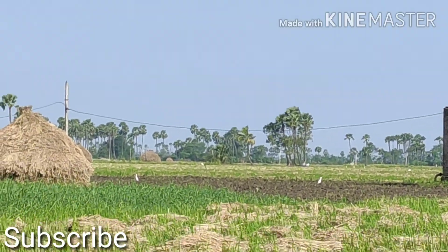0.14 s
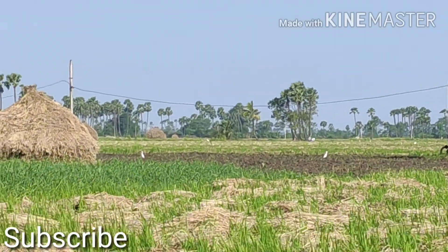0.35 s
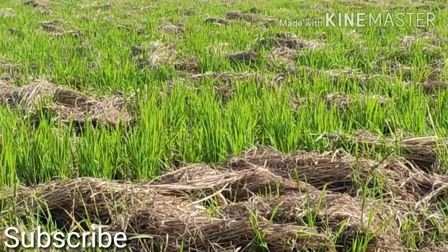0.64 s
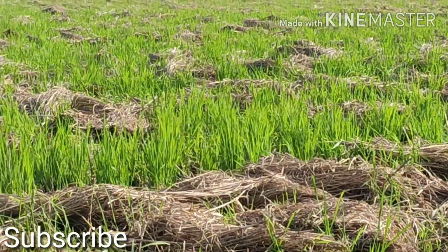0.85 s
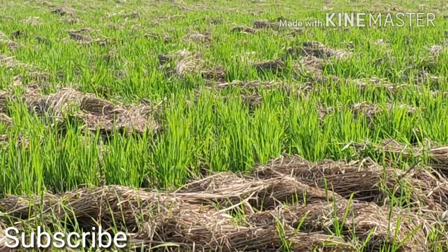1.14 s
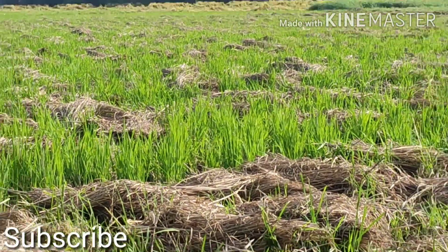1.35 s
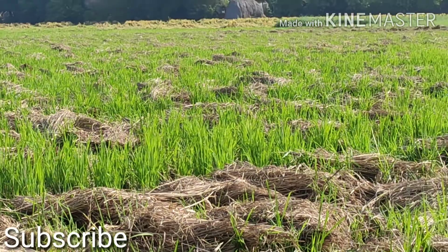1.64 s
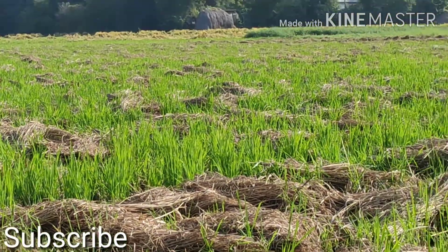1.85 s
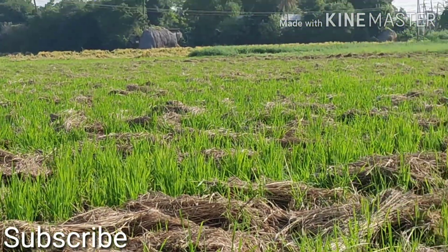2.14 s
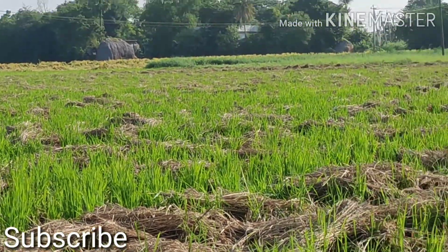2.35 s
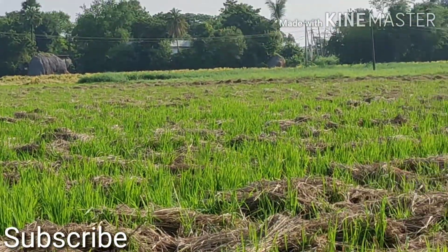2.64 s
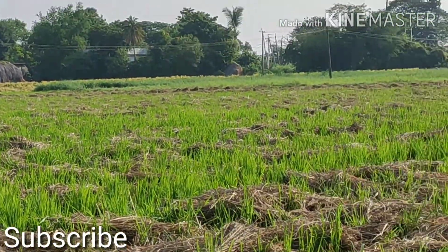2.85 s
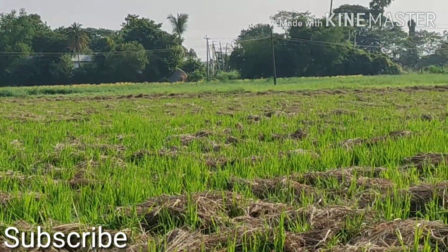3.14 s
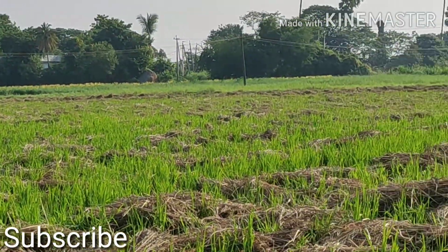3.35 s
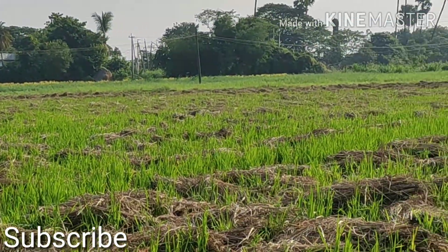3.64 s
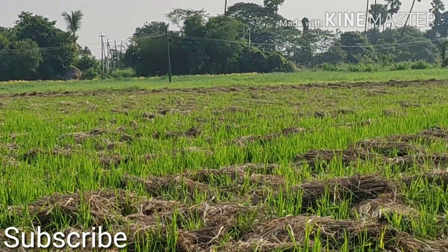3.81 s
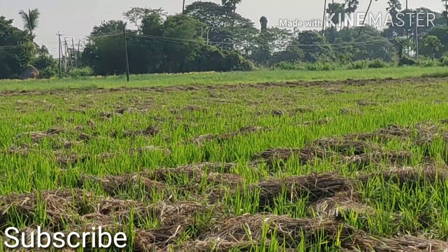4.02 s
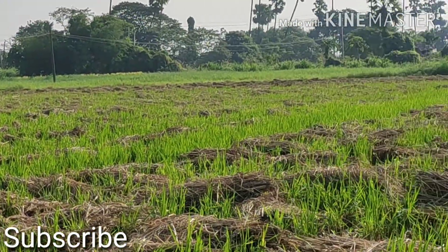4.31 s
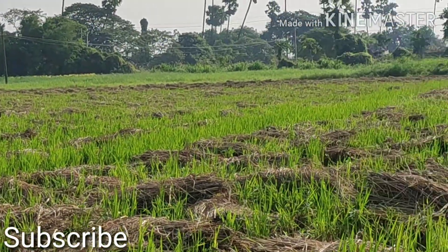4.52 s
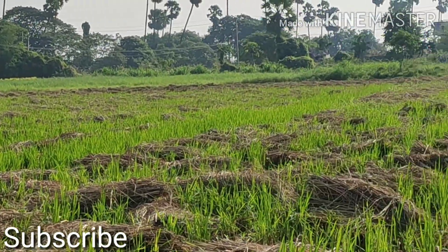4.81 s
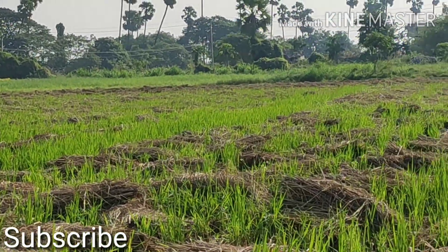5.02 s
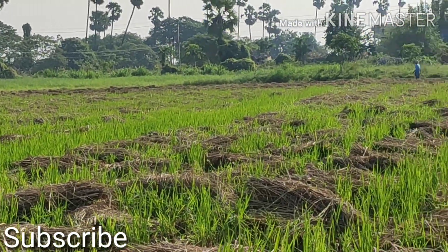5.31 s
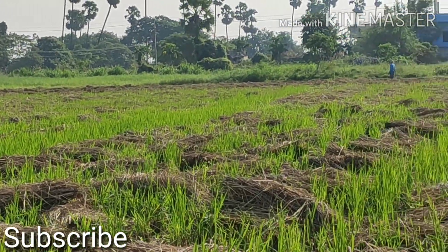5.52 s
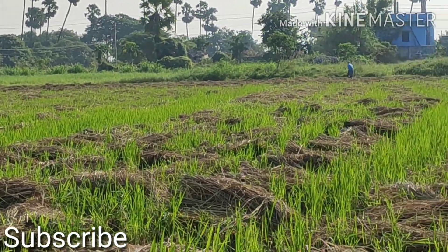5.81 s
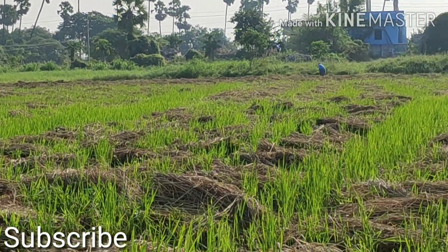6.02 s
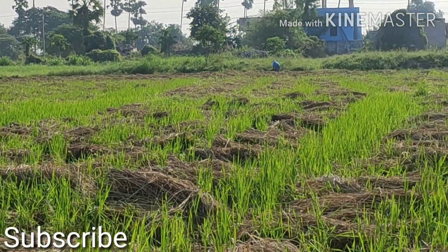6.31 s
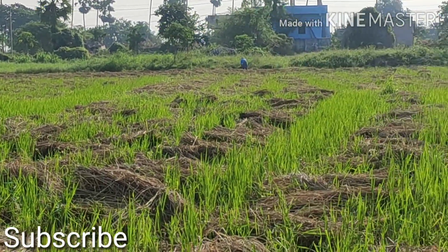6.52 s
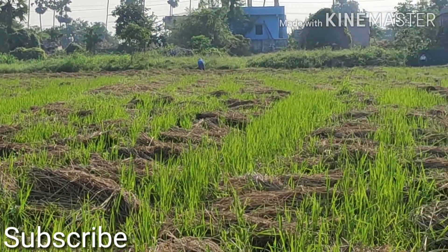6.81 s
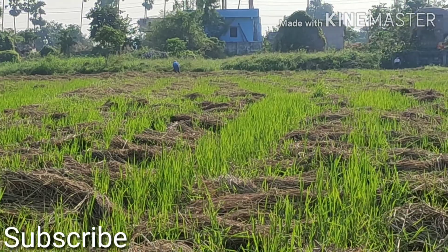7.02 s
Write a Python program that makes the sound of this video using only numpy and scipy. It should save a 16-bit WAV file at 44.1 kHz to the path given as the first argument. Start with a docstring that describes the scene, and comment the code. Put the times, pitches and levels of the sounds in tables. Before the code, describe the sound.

A quiet rural field heard through a small wind-bumped stereo microphone: soft low rumble, hiss and shimmering insects, stronger on the left. Distant crows and clucking fowl call ahead, a small bird slides down in chirps on the left. Midway one rooster crow dominates, rough at first, then thin and falling, with dry straw ticks nearby and a faint low hum fading in. Crows get clearer near the end.

```python
"""Wind bumps the microphone and the sound cuts out once, over buzzing insects, soft wind and a high hiss.
Arching, buzz-shaken caws and pulsed hoarse ones follow far off, with fowl, thin wavering whistles
and a small bird's sliding chirps on the left; resonant noise bursts tick and knock now and then.
As a low hum fades in, a rooster crows: two fluttering membranes rasp, then hold a long thin note that sags.
Trees scatter the calls back as decaying noise; caws, chirps, whistles, wind and insects carry on after it."""
import sys
import numpy as np
from scipy import signal
from scipy.fft import rfft, irfft, next_fast_len
from scipy.io import wavfile
from scipy.ndimage import uniform_filter1d, map_coordinates

SR = 44100
rng = np.random.default_rng(int(sys.argv[2]) if len(sys.argv) > 2 else 0)


def int16_out(signal):
    """Quantize to a 16-bit WAV file."""
    q = np.round(np.clip(np.atleast_2d(signal).T, -1, 1) * 32767)
    wavfile.write(sys.argv[1], SR, q.astype(np.int16))


N = 315756
TIME = np.arange(N) / SR

# resonances of the rooster's throat: f/Hz, level/dB
ROOSTER_THROAT = [(950, -11), (1100, -6.5), (1220, -5.5), (1350, -1.5), (1560, -0.5), (1720, -7.5),
                  (1950, -9), (2180, -15.5), (2330, -17), (2550, -19), (2850, -35), (3200, -24)]
LEFT_LEAD_S = .00006  # the small bird and the whistles reach the left port this much earlier


def amp(db):
    """Decibels to gain."""
    return 10 ** (np.asarray(db) / 20)


def unit(x):
    """Scale to rms 1."""
    return x / np.sqrt(np.mean(x ** 2) + 1e-20)


def along(points, hz):
    """Read (f/Hz, value) points on a log frequency axis."""
    f, v = np.transpose(points)
    return np.interp(np.log(hz + 1), np.log(f + 1), v)


def curves(rows, at=TIME):
    """One curve for each column after the first, which is the time or position."""
    s, *cols = np.transpose(rows)
    return [np.interp(at, s, c) for c in cols]


def wobble(rate, size=N):
    """A smooth random curve, rate knots a second."""
    knots = rng.standard_normal(int(size * rate / SR) + 4)
    return map_coordinates(knots, [np.arange(size) * rate / SR], order=2)


def filtered(x, response):
    """x shaped by a response of frequency in Hz."""
    size = x.shape[-1]
    m = next_fast_len(size + 8192)
    return irfft(rfft(x, m) * response(np.fft.rfftfreq(m, 1 / SR)), m)[..., :size]


def coloured(x, spectrum):
    """x through a spectrum with steep ends just beyond its outer points, at rms 1."""
    low_hz, high_hz = spectrum[0][0] / 1.2, spectrum[-1][0] * 1.2

    def response(hz):
        top = 1 / (1 + (hz / high_hz) ** 8)
        bottom = 1 / (1 + (low_hz / (hz + 1)) ** 8)
        return amp(along(spectrum, hz)) * top * bottom

    return unit(filtered(x, response))


def ring(x, centre_hz, width_hz):
    """x through one resonance applied twice."""
    def response(f):
        damping = 1j * f * width_hz
        return (damping / (centre_hz ** 2 - f * f + damping)) ** 2

    return filtered(x, response)


def turns(hz):
    """Phase in radians of a moving frequency."""
    return 2 * np.pi * np.cumsum(hz) / SR


def span(length):
    """0 to 1 over length seconds."""
    return np.linspace(0, 1, max(round(length * SR), 8))


def arch(u):
    """Strength of a call that swells and fades."""
    return np.sqrt(np.abs(np.sin(np.pi * u)))


def swell(s, width):
    """A bell of height 1 around s seconds."""
    return np.exp(-((TIME - s) / width) ** 2)


def note(length, hz, glide, bow, waver, waver_rate, harmonics_db):
    """A note that swells and fades while its pitch glides along a bow."""
    u = span(length)
    pitch = hz * (1 + glide * (u - .5) - bow * (2 * u - 1) ** 2)
    phase = turns(pitch * (1 + waver * wobble(waver_rate, size=len(u))))
    harmonics = sum(amp(db) * np.sin(k * phase) for k, db in enumerate(harmonics_db, 1))
    return np.sqrt(2) * arch(u) * harmonics


def evened(x):
    """x with its slow swings of level taken out, near rms 1."""
    window_s = 0.028  # only unevenness shorter than this survives
    return x / np.sqrt(np.abs(uniform_filter1d(x ** 2, size=round(window_s * SR))) + 1e-9)


def add(track, s, x):
    """Mix x into track at s seconds."""
    part = track[max(round(s * SR), 0):][:len(x)]
    part += x[:len(part)]


def placed(x, left_db):
    """A sound leaning left by left_db."""
    return x * amp(np.vstack([left_db / 2, -left_db / 2]))


def outdoors(x, left_db, wet_db, lead_s=0):
    """Direct sound, earlier on the left by lead_s, plus the scattered answer of the trees as decaying noise."""
    # how long the trees ring: f/Hz, time to fall 60 dB/s
    tree_decay = [(200, 0.35), (1500, 0.97), (4000, 0.34), (10000, 0.0088)]
    hz, t, z = signal.stft(rng.standard_normal((2, SR)), SR, nperseg=256)
    decay = amp(-60 * t / along(tree_decay, hz)[:, None])
    tail = signal.istft(z * decay, SR, nperseg=256)[1]
    tail = tail / np.linalg.norm(tail[0])
    direct = filtered(placed(x, left_db), lambda f: np.exp(1j * np.pi * lead_s * np.array([f, -f])))
    return direct + amp(wet_db) * signal.fftconvolve(direct, tail, axes=1)[:, :N]


def rush(spectrum):
    """Stereo noise of rms 1, alike in the bass and unrelated in the treble."""
    # likeness of left and right: f/Hz, correlation 0-1
    likeness = [(25, 0.33), (60, 0.93), (130, 1), (300, 0.86), (800, 0.33), (1500, 0), (3000, 0), (8000, 0)]

    def mid_side(hz):
        angle = np.arccos(np.clip(along(likeness, hz), -1, 1)) / 2
        return np.array([np.cos(angle), np.sin(angle)])

    mid, side = filtered(rng.standard_normal((2, N)), mid_side)
    return coloured(np.array([mid + side, mid - side]), spectrum)


def rooster():
    """Two membranes of the syrinx; when pressed hard they flutter and the clean note breaks into a rasp."""
    # low rasp of the chest: f/Hz, level/dB
    chest_rasp = [(300, -18), (500, -11), (620, 4), (680, 2), (800, -9), (900, -7), (1100, -10)]
    # friction in the throat: f/Hz, level/dB
    friction_colour = [(2800, -12), (3200, -9), (3700, -2), (4400, -7), (5100, -11), (5800, 1), (6200, 2),
                       (6700, -5), (7200, 1), (8500, -10)]
    # how the tired rasp dulls: f/Hz, gain/dB
    dulling_tilt = [(1650, 3.5), (1950, -4)]
    # stretch over which the rasp dulls and half tones creep in: start/s, end/s
    tired_span = (3.35, 3.634)
    pitch, over_gain, base_gain = syllables()
    rough, break_gain, friction_gain = breaks()
    # unsteadiness as shares of the pitch: slow drift, then fast jitter that grows with the rasp
    pitch = pitch * (1 + .0035 * wobble(35) + (.0055 + .028 * rough ** 2) * wobble(190))
    phase = turns(pitch)
    source = slaps(pitch, phase)
    tired = np.interp(TIME, tired_span, [0, 1])

    rasp = coloured(source, ROOSTER_THROAT)
    dulled = filtered(rasp, lambda hz: amp(along(dulling_tilt, hz)))
    rasp = (1 - tired) * rasp + tired * dulled
    # the rasp runs a quarter cycle off the clean note, so their powers add
    overtones = np.sqrt(1 - rough) * clean_note(pitch, phase) + np.sqrt(rough) * evened(rasp)
    # the tiring voice gains tones halfway between its harmonics
    halves = phase / 2 + .5 * wobble(90)
    overtones = overtones + amp(-22.5) * tired * (np.sin(halves) + np.sin(halves + phase))

    low_rasp = evened(coloured(source, chest_rasp))
    base = np.sqrt(2 * (1 - rough)) * np.sin(phase) + np.sqrt(rough) * low_rasp
    breath = rng.standard_normal(N) * (1 + np.cos(phase))
    friction = amp(-58) * friction_gain * coloured(breath, friction_colour)
    shimmer = amp(1.3 * wobble(45))  # the overtones waver in strength
    voice = shimmer * break_gain * over_gain * overtones + base_gain * base + growls()
    heard = outdoors(voice, left_db=-.8, wet_db=-14.5, lead_s=.00006)
    # the left port hears more of the treble
    heard = filtered(heard, lambda hz: placed(0.89, along([(1600, 0), (5000, 19)], hz)))
    return heard + outdoors(friction, left_db=10.5, wet_db=-5)


def syllables():
    """Pressure builds, holds and drops in each syllable, lifting pitch/Hz, overtone gain and fundamental gain."""
    # the crow's syllables: start/s, end/s, rise/s, fall/s, held pitch f/Hz, overtones level/dB,
    # change of the overtones at the edges/dB, fundamental level/dB
    crow_syllables = [(2.568, 2.775, 0.061, .075, 730.6, -39.5, -9.5, -51.5),
                      (2.881, 3.076, 0.037, 0.01215, 790, -34, -8.5, -45),
                      (3.056, 4.42, .055, .085, 784.7, -38.5, -3, -45)]
    # the long last syllable peaks, then sags as the bird tires:
    # t/s, pitch change/Hz, overtones change/dB, fundamental change/dB
    tiring_curve = [(3.12, 0, -1, 2.5), (3.18, 57, 3, 0.5), (3.22, 20, .5, -1), (3.3, -14.5, 1, 0),
                    (3.345, -25, -4.5, -10), (3.38, -17.5, -1.5, -16), (3.43, -14, 1.5, -7),
                    (3.48, -13.5, -1.5, -10), (3.565, -7.5, -1, -10), (3.6, 0, 1.5, -12),
                    (3.625, -25.5, -2.5, -10), (3.67, -46, 1, -14), (3.75, -44.5, -1.5, -2),
                    (3.83, -72.5, 1, -6), (3.9, -86.5, -11, -22), (3.95, -66, -12, -19),
                    (3.985, -40, -5.5, -23), (4.13, -44.5, -4.5, -15), (4.22, -54.5, -6.5, -7),
                    (4.28, -64, -7.5, -9), (4.335, -100, -14.5, -7), (4.4, -150, -10, -4)]
    slack_hz, slack_base_db = 552, -5.5  # pitch and fundamental change with no pressure behind the voice
    attack_s, release_s = 0.016, 0.03
    snap = 8  # how abruptly the voice leaps from its slack register to the high one
    sag_hz, tired_db, tired_base_db = curves(tiring_curve)
    pitch, over, base = np.full(N, float(slack_hz)), np.zeros(N), np.zeros(N)
    for start, end, rise, fall, hz, over_db, edge_db, base_db in crow_syllables:
        ramp = lambda up, down: np.clip(np.minimum((TIME - start) / up, (end - TIME) / down), 0, 1)
        pressure = ramp(rise, fall) ** snap
        flow = ramp(attack_s, release_s)
        pitch += pressure * (hz + sag_hz - slack_hz)
        over += flow * amp(over_db + tired_db + edge_db * (1 - pressure))
        base += flow * amp(base_db + tired_base_db + slack_base_db * (1 - pressure))
    return pitch, over, base


def breaks():
    """The note is nearly clean except where it breaks: roughness, overtone gain, friction gain."""
    # bouts of rasp: start/s, end/s, roughness 0-1, overtones change/dB, friction change/dB
    rasp_bouts = [(2.622, 2.708, .95, -1, 0), (2.972, 3.075, .8, -9, -5), (3.085, 3.165, .9, 0, -2),
                  (3.165, 3.205, .4, 0, -1), (3.205, 3.36, .88, 0, 0), (3.36, 3.44, .3, 0, -2),
                  (3.625, 3.94, .66, 0, -8), (4.32, 4.43, .7, 0, -8)]
    break_s, clean_rough = 0.018, 0.06  # time to break or clear; roughness of the clean note
    rough, level_db, friction = np.zeros((3, N))
    for start, end, depth, db, friction_db in rasp_bouts:
        bout = np.clip(.5 + np.minimum(TIME - start, end - TIME) / break_s, 0, 1)
        rough = rough + depth * bout
        level_db = level_db + db * bout
        friction = friction + amp(friction_db) * bout
    return np.clip(rough, clean_rough, 1), amp(level_db), friction


def slaps(pitch, phase):
    """Two membranes beat together, which bunches their slaps and splits every harmonic into shifting lines."""
    # the second membrane is unsteady and stays below the first
    partner_hz = np.minimum(652, .83 * pitch) * (1 + .03 * wobble(110))
    beat = phase - turns(partner_hz)
    unsteady = phase - .4 * np.sin(beat) + .45 * wobble(330)
    train = sum(np.cos(k * unsteady) for k in range(1, 5))
    turbulence = 1.3 * rng.standard_normal(N) * (1 + np.cos(phase))
    flutter = 1 + 1.05 * np.sin(beat + .8 * wobble(70))
    return (train + turbulence) * flutter * (1 + .2 * wobble(420))


def clean_note(pitch, phase):
    """Overtones of the held note, weighed by the throat relative to the octave."""
    # the octave drops out once: t/s, width/s, change/dB
    octave_catch = (4.202, .03, -40)
    # the third harmonic flares as the beak narrows: t/s, width/s, gain/dB
    third_flares = [(3.733, .028, 19), (4.09, 0.09, 9), (4.27, 0.05, 20)]
    catch_s, catch_width, catch_db = octave_catch
    octave_db = catch_db * swell(catch_s, catch_width)
    third_db = -10 + sum(db * swell(s, width) for s, width, db in third_flares)
    fourth_db = -10
    gain = lambda k: amp(along(ROOSTER_THROAT, k * pitch) - along(ROOSTER_THROAT, 2 * pitch))
    levels_db = [octave_db, third_db, fourth_db]
    return np.sqrt(2) * sum(amp(db) * gain(k) * np.sin(k * phase) for k, db in enumerate(levels_db, 2))


def growls():
    """The other side of the syrinx growls below the note, in short shaky notes."""
    # t/s, length/s, f/Hz, glide as a share of the pitch, fundamental level/dB, octave level/dB
    growl_notes = [(2.57, .042, 575.6, 0.083, -48, -47), (2.594, 0.12, 657, 0.0074, -44.5, -62),
                   (2.708, 0.06, 564, -0.053, -59, -43), (2.9, 0.13, 630, 0.0053, -44, -54),
                   (3.082, 0.14, 660, 0.16, -45.5, -45), (3.295, 0.098, 662, -0.082, -40, -55),
                   (3.359, .1, 532, 0.021, -63, -46.5), (3.578, 0.081, 560, 0.073, -60, -51),
                   (3.618, 0.09, 631, 0.07, -48.5, -53), (3.76, 0.062, 499, -0.09, -56, -64),
                   (3.822, .065, 666, -0.17, -47, -55), (3.871, 0.11, 552, 0.0062, -64, -50),
                   (3.932, 0.049, 628, 0.13, -45.5, -64.5), (4.328, 0.049, 645, -0.21, -48, -62),
                   (4.395, .045, 660, -.14, -54.5, -62)]
    track = np.zeros(N)
    for s, length, hz, glide, db, octave_db in growl_notes:
        growl = note(length, hz, glide, bow=0.045, waver=0.026, waver_rate=115.0,
                     harmonics_db=[db, octave_db])
        add(track, s, growl)
    return track * (1 + 0.37 * wobble(100))


def crows():
    """Each caw is an arching note shaken by a slow buzz, which splits its harmonics into combs."""
    # buzzing caws: t/s, length/s, f/Hz before the bend, buzz f/Hz, level/dB, lift of the second harmonic/dB
    caw_calls = [(2.031, 0.36, 563, 86.9, -59, 6), (4.44, 0.33, 552, 83.6, -54.5, 2.5),
                 (4.991, .39, 536, 90.3, -54, 2), (5.618, 0.36, 541.6, 86.1, -48.5, -2.5)]
    # course of a caw: share of its length, pitch ratio, level change/dB
    caw_course = [(0, 0.92, -17), (.1, 0.935, 1), (.32, 0.99, 2.5), (.55, 0.95, 3), (.75, .895, 2),
                  (.92, .805, 0), (1, .78, -13)]
    # resonances of the crow's throat: f/Hz, level/dB
    caw_colour = [(450, -18.5), (800, -19), (1050, -4), (1200, -5), (1320, 5), (1650, -5), (1820, -18),
                  (2300, -15), (3500, -30.5)]
    chop_depth, shake_rad, breath = .25, .45, .45  # buzz in strength and in phase; air noise
    track = np.zeros(N)
    for s, length, hz, buzz_hz, db, low_db in caw_calls:
        u = span(length)
        bend, shape_db = curves(caw_course, u)
        phase = turns(hz * bend * (1 + 0.00827 * wobble(145.6, size=len(u))))
        buzz = turns(buzz_hz * (1 + .07 * wobble(70, size=len(u))))
        # the buzz shakes pitch more than strength, and relaxes towards the end of the caw
        depth = 1 - u ** 5
        chop = np.exp(chop_depth * depth * (np.cos(buzz) - 1))
        phase = phase + shake_rad * depth * np.sin(buzz + np.pi / 4)
        harmonics = sum(amp(low_db * (k == 2)) * np.sin(k * phase) for k in range(1, 7))
        voice = harmonics + breath * rng.standard_normal(len(u))
        add(track, s, amp(db + shape_db) * coloured(chop * voice, caw_colour))
    return outdoors(track, left_db=-1, wet_db=-12, lead_s=-.0001)


def hoarse_caws():
    """Jittery pulses on an arching pitch ring three resonances of a crow's throat."""
    # hoarse far caws: t/s, length/s, throat f/Hz, level/dB, low resonance/dB
    hoarse_calls = [(0.745, 0.26, 1910, -52.5, -6), (1.072, 0.14, 1630, -65.5, 6),
                    (1.51, 0.26, 1930, -53, -10), (5.08, 0.23, 2170, -58.5, -12),
                    (6.25, 0.32, 1660, -58, -9)]
    track = np.zeros(N)
    for s, length, hz, db, low_db in hoarse_calls:
        u = span(length)
        pulse_hz = 140 * (1 - .04 * (2 * u - 1) ** 2 + .02 * wobble(200, size=len(u)))
        cycle = turns(pulse_hz) / (2 * np.pi)
        pulses = np.diff(np.floor(cycle), prepend=0) + .02 * rng.standard_normal(len(u))
        voice = unit(ring(pulses, hz, width_hz=330))
        voice = voice + amp(-8) * unit(ring(pulses, centre_hz=1440, width_hz=200))
        voice = voice + amp(low_db) * unit(ring(pulses, centre_hz=890, width_hz=680))
        add(track, s, amp(db + 2.5 * wobble(60, size=len(u))) * arch(u) * voice)
    return outdoors(track, left_db=0, wet_db=-9)


def fowl():
    """Arching calls and rough clucks of fowl far ahead, each a wavering tone and its octave."""
    # t/s, length/s, f/Hz, glide as a share of the pitch, level/dB, octave/dB, waver as a share of the pitch
    fowl_calls = [(0.869, 0.055, 894, 0.034, -54.5, 4, .06), (1.019, 0.025, 797, -0.025, -54.5, -14, .08),
                  (1.075, 0.023, 812, -0.014, -53, -2, 0.097), (1.148, 0.024, 890, -0.017, -56, -18, .08),
                  (1.496, 0.048, 773, -0.09933, -51.5, -6, 0.095),
                  (1.638, 0.063, 764, 0.028, -53, 2, 0.092), (1.668, 0.15, 877, 0.1, -50.5, -14, 0.027),
                  (1.835, 0.1, 771, -0.1, -56.5, -3, 0.092), (2.19, 0.23, 815, -0.11, -60.5, -18, 0.061),
                  (4.63, 0.25, 865, -0.055, -73, 11, 0.016), (4.749, 0.19, 766, -0.0086, -60.5, -9, 0.014),
                  (4.889, 0.038, 718, -0.088, -58.5, 4, .03), (5.315, 0.12, 786, -0.09, -51, -9, .012),
                  (5.417, 0.025, 718, -0.026, -62, 10, 0.018),
                  (5.567, 0.061, 734, -0.038, -53.5, -4, 0.056), (5.985, 0.025, 715, -.08, -68, 5, 0.04355),
                  (6.125, 0.161, 924, -0.11, -59.5, -9, 0.026)]
    track = np.zeros(N)
    for s, length, hz, glide, db, octave_db, waver in fowl_calls:
        call = note(length, hz, glide, bow=0.0313, waver=waver, waver_rate=256, harmonics_db=[0, octave_db])
        add(track, s, amp(db) * call)
    return outdoors(track, left_db=-1, wet_db=-7, lead_s=-.00025)


def birds():
    """A small bird on the left: notes slide down at one rate, and some chirps follow a short lower note."""
    # falling chirps: t/s, length/s, f/Hz, level/dB, strength of the lead-in note 0-1
    chirp_notes = [(1.414, 0.032, 3438, -62, 0), (1.713, 0.056, 4020, -58, .8),
                   (1.971, 0.06, 3890, -58, 0.7), (2.237, 0.058, 4030, -55, 0.6),
                   (3.035, 0.064, 4200, -59, 0.7), (3.514, 0.039, 3150, -58.5, 0.3),
                   (3.565, .04, 4100, -62, 0), (3.759, 0.043, 2940, -56.5, 0.2),
                   (3.89, .045, 4286, -56, 0.61), (4.893, 0.059, 3390, -56.5, 0.4),
                   (5.18, .04, 6100, -57, 0), (6.96, 0.054, 2770, -54, 0)]
    # squeaks rich in overtones: t/s, length/s, f/Hz, level/dB
    squeak_notes = [(4.918, 0.05842, 2125, -57), (5.13, 0.088, 2300, -56.5), (7.001, 0.0305, 2070, -57.5)]
    # harmonics 1 to 3 of a squeak: level/dB
    squeak_harmonics = [-1, 2.5, -4]
    fall_per_s = 5  # share of its pitch that a note slides down each second
    lead_s, lead_length_s, lead_ratio = .036, .033, .85  # lead-in: head start, length, pitch over the chirp's

    def slide(length, hz, harmonics_db):
        return note(length, hz, -fall_per_s * length, bow=0.0178, waver=.016, waver_rate=900,
                    harmonics_db=harmonics_db)

    track = np.zeros(N)
    for s, length, hz, db, lead in chirp_notes:
        add(track, s, amp(db) * slide(length, hz, [0]))
        add(track, s - lead_s, lead * amp(db) * slide(lead_length_s, lead_ratio * hz, [0]))
    for s, length, hz, db in squeak_notes:
        add(track, s, amp(db) * slide(length, hz, squeak_harmonics))
    return outdoors(track, left_db=8, wet_db=-7, lead_s=LEFT_LEAD_S)


def whistles():
    """Long thin tones that waver and flicker, blurred by distance."""
    # t/s, length/s, f/Hz, level/dB
    whistle_tones = [(.245, .13, 4760, -56.5), (.39, .17, 2980, -63.5), (.62, .2, 4700, -65),
                     (3.66, .25, 4400, -66), (3.85, .9, 3450, -69), (4.03, .7, 3790, -71),
                     (4.85, .65, 3435, -68), (5.02, .5, 3778, -60), (5.68, .24, 2920, -62.5),
                     (5.73, .2, 3275, -64), (6.05, .1, 2915, -59.5), (6.18, .11, 2900, -59.5),
                     (6.02, .62, 3255, -65), (6.42, .2, 2890, -65), (6.77, .38, 3260, -65),
                     (6.8, .35, 2885, -66)]
    track = np.zeros(N)
    for s, length, hz, db in whistle_tones:
        u = span(length)
        phase = turns(hz * (1 + .007 * wobble(200, size=len(u))))
        flicker_db = 2.5 * wobble(35, size=len(u))
        add(track, s, amp(db) * arch(u) * unit(amp(flicker_db) * np.sin(phase)))
    return outdoors(track, left_db=7, wet_db=-7, lead_s=LEFT_LEAD_S)


def taps():
    """Straw ticks close by and a few dull knocks: quickly dying noise through a resonance."""
    # dry straw: t/s, peak level/dB, f/Hz, width/Hz
    straw_ticks = [(2.701, -44, 12500, 8000), (2.773, -44, 13000, 9000), (2.792, -28.5, 10100, 8040),
                   (3.09, -37, 6900, 4500), (3.135, -34, 6150, 4000), (3.149, -45, 6500, 5000),
                   (3.25, -41, 9346, 1798), (6.458, -43, 12000, 9000)]
    # dull knocks: t/s, peak level/dB, f/Hz
    dull_knocks = [(0.261, -42, 800), (4.629, -41, 520), (5.556, -37, 1030), (6.977, -38.5, 1030)]
    ticks, knocks, t = np.zeros(N), np.zeros(N), np.arange(SR // 10) / SR
    for s, db, hz, width_hz in straw_ticks:
        snap = ring(rng.standard_normal(len(t)) * amp(-60 * t / .014), hz, width_hz)
        add(ticks, s, amp(db) * snap / np.abs(snap).max())
    for s, db, hz in dull_knocks:
        knock = ring(rng.standard_normal(len(t)) * amp(-60 * t / 0.021), hz, width_hz=810)
        add(knocks, s, amp(db) * knock / np.abs(knock).max())
    return outdoors(ticks, left_db=5, wet_db=-18) + outdoors(knocks, left_db=0, wet_db=-10)


def insects():
    """Wing strokes in short chirps excite a resonance."""
    # grass insects: f/Hz, width/Hz, strokes per second/Hz, chirps per second/Hz, level/dB, left over right/dB
    grass_insects = [(7980, 580, 112, 6.6, -64.5, 9), (7560, 75, 81, 3.6, -80, 19),
                     (7190, 340, 110, 5.5, -75, 23), (8030, 1470, 140, 16, -70, 17)]
    out = np.zeros((2, N))
    for hz, width_hz, pulse_hz, chirp_hz, db, left_db in grass_insects:
        strokes = np.exp(1.5 * np.cos(turns(pulse_hz * (1 + .02 * wobble(10)))))
        chirp_cycle = np.sin(turns(chirp_hz * (1 + .1 * wobble(5))))
        chirps = 1 / (1 + np.exp(-4 * (chirp_cycle + .75)))
        song = unit(ring(rng.standard_normal(N) * strokes * chirps, hz, width_hz))
        out += outdoors(amp(db + .6 * wobble(2)) * song, left_db, wet_db=-4)
    return out


def hum():
    """Wavering low tones, perhaps a far engine, fade in as the crow begins."""
    # f/Hz, level/dB
    hum_tones = [(157, -63.5), (186, -66.5), (204, -73)]
    # fade-in: start/s, end/s
    hum_fade = (2.4, 3.6)
    lines = np.zeros(N)
    for hz, db in hum_tones:
        level = amp(db + 2.7 * wobble(5))
        lines += level * np.sin(turns(hz * (1 + .03 * wobble(8))))
    return placed(np.sqrt(2) * np.interp(TIME, hum_fade, [0, 1]) * lines, left_db=-1)


def sizzle():
    """A faint high hiss on the left, resonant noise, swells and fades behind the crow."""
    # t/s, swell width/s, f/Hz, width/Hz, level at the height of the swell/dB
    sizzle_swell = (3.5, 0.5, 5603, 2400, -59)
    s, width, hz, width_hz, db = sizzle_swell
    noise = unit(ring(rng.standard_normal((2, N)), hz, width_hz))
    return placed(amp(db) * swell(s, width) * noise, left_db=7)


def air():
    """Wind rumble with single pressure bumps, the murmur of open land and a high hiss."""
    # strength of the breeze: t/s, level/dB
    breeze_course = [(0, -40.5), (.3, -40), (.8, -43.5), (2.3, -43.5), (2.8, -43.5), (4.6, -42.5),
                     (5.15, -43.5), (6.1, -41.5), (6.55, -37), (7.16, -42.5)]
    # wind rumble: f/Hz, level/dB
    rumble_colour = [(8.8, -9.5), (15, 4.5), (28, -1.5), (55, -5), (135, -16), (187, -22.5), (229, -32.5),
                     (285, -29), (392, -31.5), (421, -29.5), (480, -28.5), (620, -61), (1060, -120)]
    # wind on the ports: t/s, level of a centred bump/dB, width/s, side (1 left only, -1 right only)
    wind_bumps = [(0.166, -19, 0.0087, 1), (0.221, -25, 0.021, 0.91), (0.265, -31.5, 0.026, 1),
                  (.387, -31.5, 0.0078, 0.55), (0.579, -28, 0.0093, -0.89), (2.826, -33, 0.01, -0.74),
                  (4.658, -37, 0.017, -.3), (4.785, -37.5, 0.019, -0.71), (6.266, -27, 0.0063, -0.83),
                  (6.523, -31, 0.026, -1.3), (6.907, -29.5, 0.01, -1)]
    # murmur of open land: f/Hz, level/dB
    field_colour = [(150, -3.5), (300, -8.5), (500, -7), (800, 0.5), (1200, -4), (2000, -6.5),
                    (3000, -12.5), (5000, -44), (9000, -57)]
    # high hiss: f/Hz, level/dB
    hiss_colour = [(1500, 7), (3500, 6.5), (5500, 5.5), (7000, 8), (8000, 11.5), (9000, 7.5), (10500, 1),
                   (15000, -1)]
    # course of the hiss: t/s, level/dB
    hiss_course = [(0, -51.5), (.38, -51), (.45, -55), (7.16, -53.5)]
    buffet_db, = curves(breeze_course)
    rumble = amp(buffet_db + 1.14 * wobble(9)) * rush(rumble_colour)
    rumble = placed(rumble, 3 * wobble(3.97))  # the wind swings from port to port
    for s, db, width, side in wind_bumps:
        u = (TIME - s) / width
        bump = (1 - 2 * u ** 2) * np.exp(-u ** 2)
        rumble = rumble + amp(db) * np.vstack([1 + side, 1 - side]) * bump
    field = amp(-54.7 + 1.4 * wobble(7.2)) * rush(field_colour)
    hiss_db, = curves(hiss_course)
    # the hiss leans left, most of all around 8 kHz
    lean = [(2000, 1.4), (5000, 2.8), (8000, 4.3), (13000, 0.34)]
    hiss = filtered(amp(hiss_db) * rush(hiss_colour), lambda hz: placed(1, along(lean, hz)))
    return rumble + field + hiss


def scene():
    """Everything heard from the edge of the field."""
    calls = rooster() + crows() + hoarse_caws() + fowl() + birds() + whistles()
    return calls + taps() + insects() + hum() + sizzle() + air()


def record(dry):
    """The sound cuts out for a moment; nothing is kept above the band limit."""
    # cut-out: start/s, end/s
    silent_gap = (.295, .315)
    live = 1.0 * ((TIME < silent_gap[0]) | (TIME > silent_gap[1]))
    live = uniform_filter1d(live, size=40)  # soft edges
    return filtered(dry * live, lambda hz: hz < 15600)


dry = scene()
out = record(dry)
int16_out(out)
```